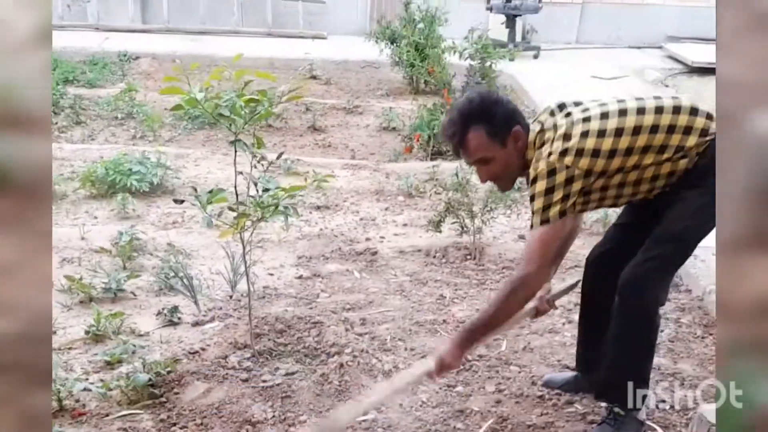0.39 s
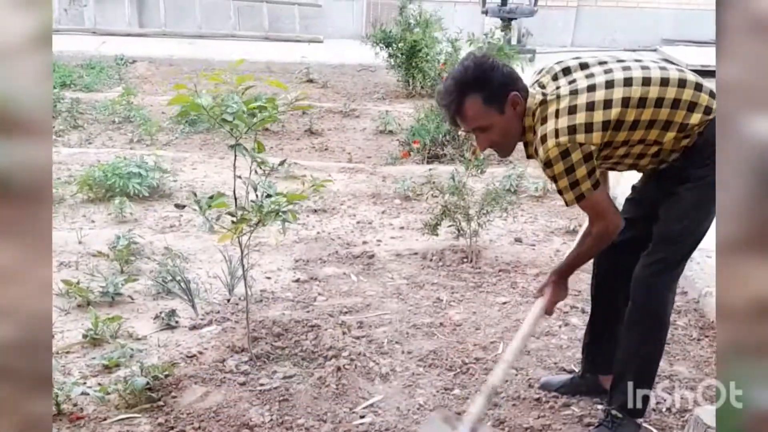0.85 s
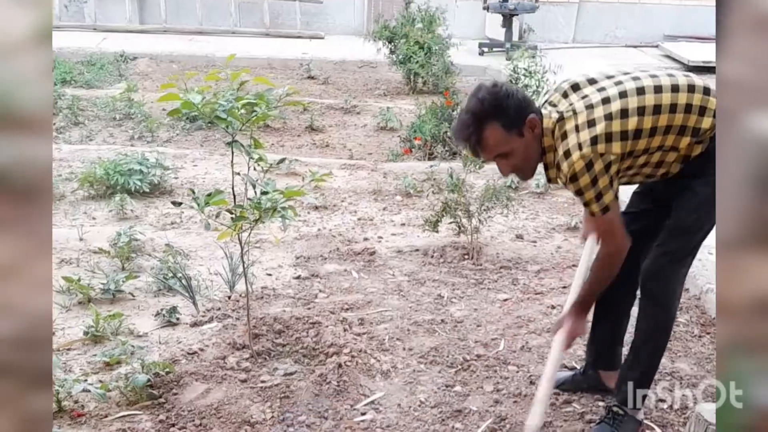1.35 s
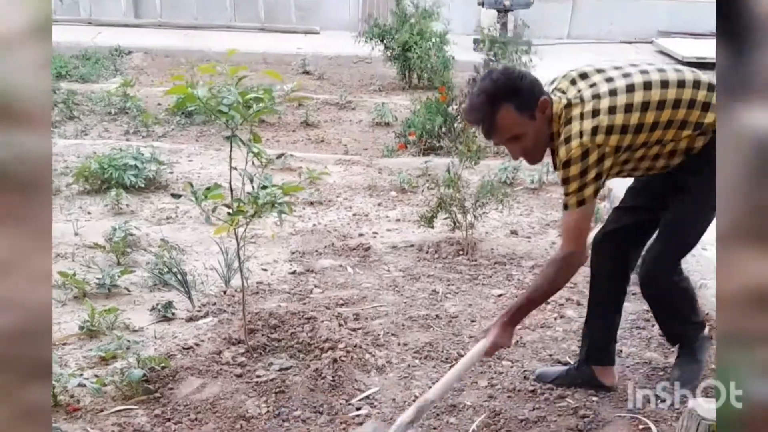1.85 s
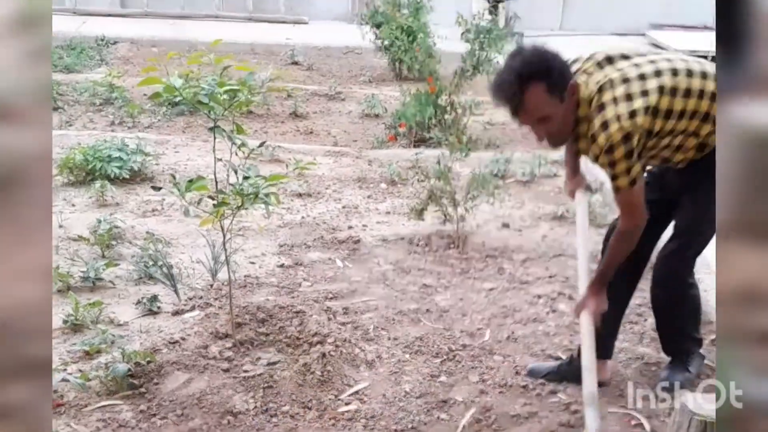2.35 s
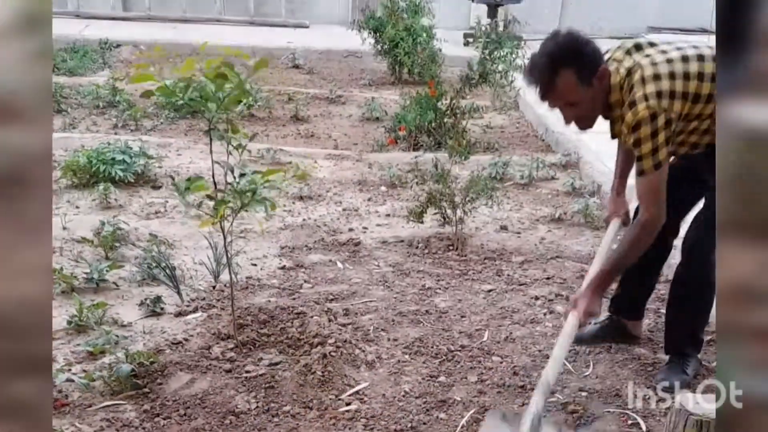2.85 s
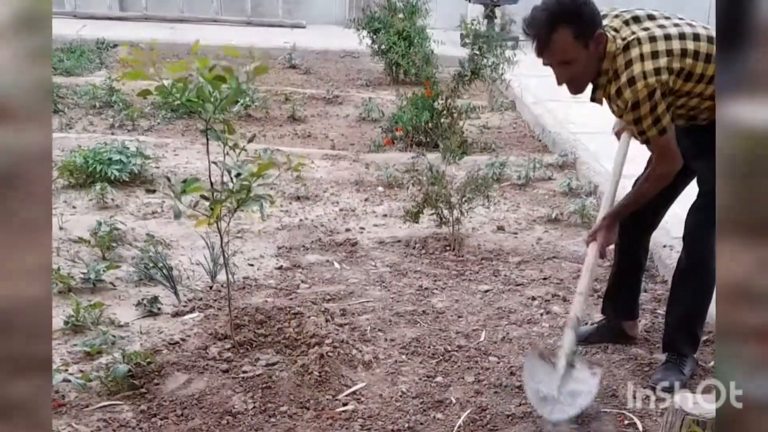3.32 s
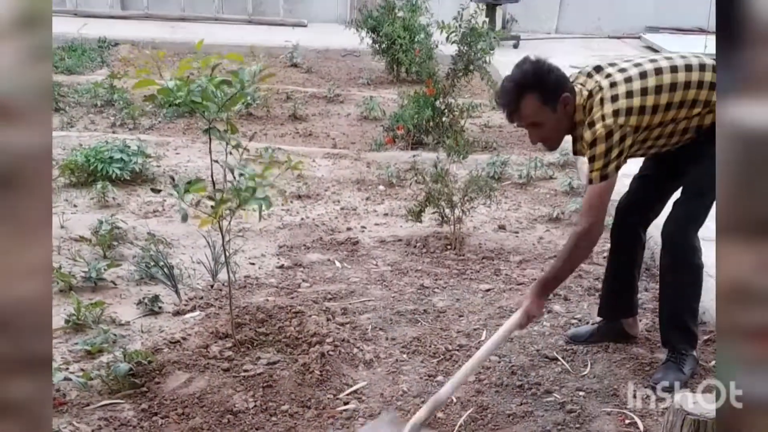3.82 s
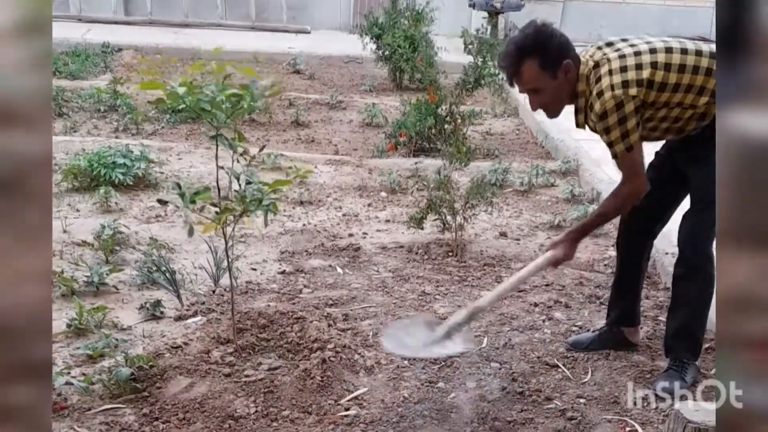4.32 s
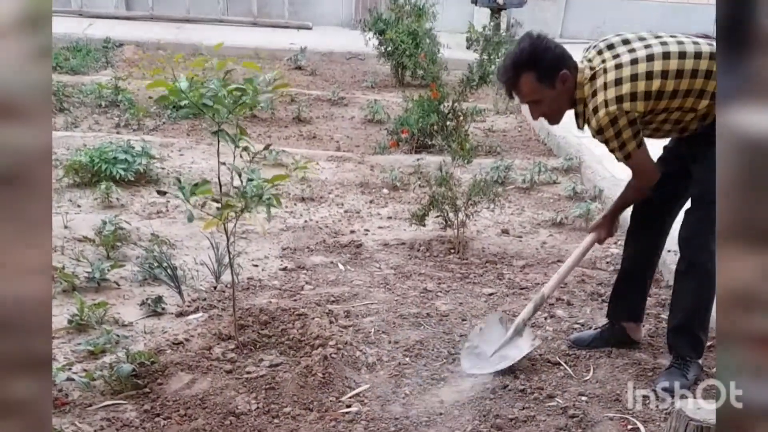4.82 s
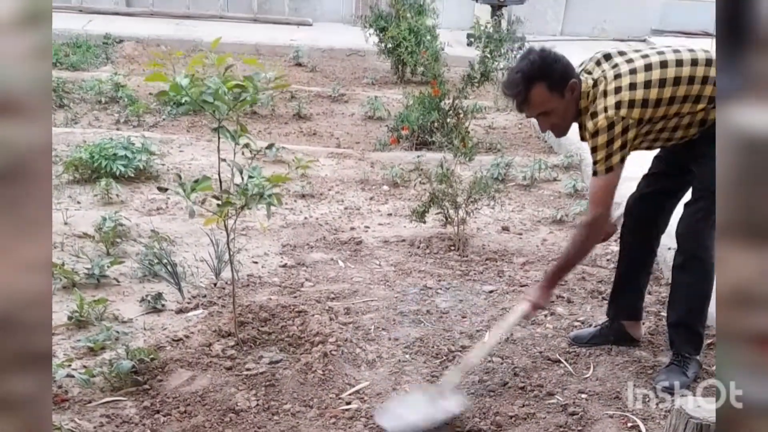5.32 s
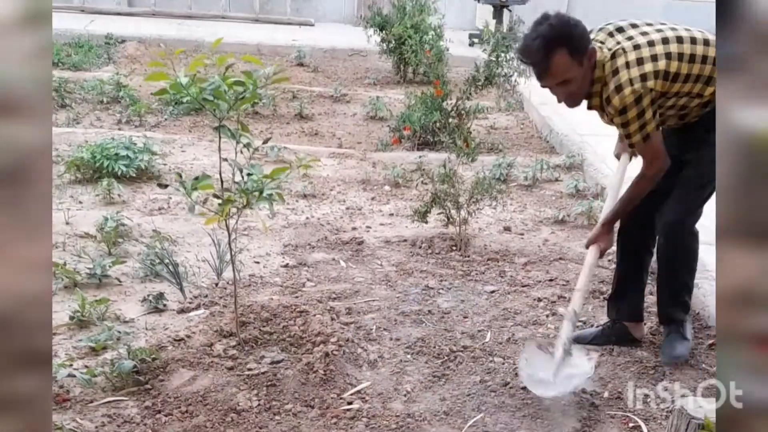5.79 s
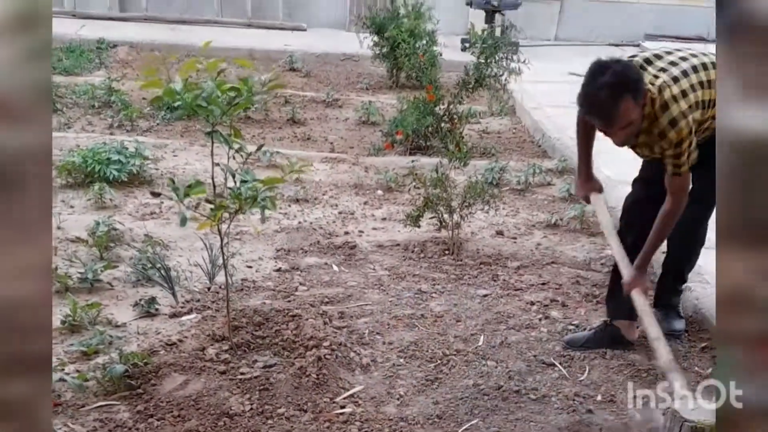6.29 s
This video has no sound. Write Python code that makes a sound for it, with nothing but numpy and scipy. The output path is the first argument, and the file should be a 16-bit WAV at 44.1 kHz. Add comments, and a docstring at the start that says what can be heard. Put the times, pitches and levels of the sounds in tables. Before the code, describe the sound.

A steel shovel chops into dry, stony soil eight times outdoors, each chop followed by a gritty drag, with low thumps and thin background hiss.

```python
"""A low drone, far traffic and thin outdoor hiss open the scene at a small two-port microphone.
The drone soon fades, and a few steps away a steel shovel chops into dry soil eight times and drags through it.
Filtered noise makes the background and the swells of deep rumble, most of them during the pulls.
Grains of noise force and short stone bursts rub and click on the blade, which rings briefly in damped modes.
Damped low swings thump the ground, some under a chop, others during or after a pull."""
import sys
import numpy as np
from scipy import signal
from scipy.fft import rfft, irfft
from scipy.io import wavfile
from scipy.ndimage import uniform_filter1d

SR = 44100
rng = np.random.default_rng(int(sys.argv[2]) if len(sys.argv) > 2 else 0)


def store_wav(level_fs):
    """Save 16-bit WAV to argv[1]."""
    pcm = np.round(np.clip(np.atleast_2d(level_fs), -1, 1) * 32767)
    wavfile.write(sys.argv[1], SR, pcm.T.astype(np.int16))


def magnitude_from_level(level_db):
    """Linear magnitude for a level in decibels (20 dB per decade)."""
    exponent = np.asarray(level_db, float) / 20
    return 10 ** exponent


N = 283122  # samples


def evened(x):
    """Scales to rms 1."""
    return x / np.sqrt(np.mean(x ** 2) + 1e-20)


def read(points, hz):
    """Reads a spectrum table on a log-frequency axis."""
    f, value = np.transpose(points)
    return np.interp(np.log(hz + 1), np.log(f + 1), value)


def wander(corner_hz, count):
    """Slow chance curves of rms about 1: low-passed noise drawn 60 times a second."""
    knots = rng.standard_normal((count, int(N / SR * 60) + 2))
    smooth = signal.lfilter([1], [1, -np.exp(-2 * np.pi * corner_hz / 60)], knots, axis=1)
    at = np.arange(N) * 60 / SR
    return np.array([np.interp(at, np.arange(len(k)), evened(k - k.mean())) for k in smooth])


def field(tone, likeness, patchy_db, lumpy_db):
    """Diffuse noise at two ports: random short-time spectra with drifting patches and lumps shared by all bins."""
    frames, hz = N // 256 + 5, np.fft.rfftfreq(1024, 1 / SR)
    a, b, c, d, patches = rng.standard_normal((frames, 513, 5)).T
    patches = evened(uniform_filter1d(uniform_filter1d(patches, 8, 0), 12, 1))
    lumps = evened(uniform_filter1d(rng.standard_normal(frames), 6))
    same = np.clip(read(likeness, hz), -1, 1)[:, None]
    left = a + 1j * b
    right = same * left + np.sqrt(1 - same ** 2) * (c + 1j * d)
    gain = magnitude_from_level(read(tone, hz)[:, None] + patchy_db * patches + lumpy_db * lumps)
    spectra = np.array([left, right]) * gain
    return evened(signal.istft(spectra, nperseg=1024, noverlap=768)[1][:, :N])


def rumble():
    """A distant low drone that dies away: noise in one narrow wavering band."""
    level_db, pitch_hz, width_hz = -51, 138.2, 30
    end_s, fade_db_per_s = 0.53, 120
    t = np.arange(N) / SR
    r = np.exp(-np.pi * width_hz / SR)
    slow = signal.lfilter([1], [1, -2 * r, r * r], rng.standard_normal((N, 2)) @ [1, 1j])
    drone = (slow * np.exp(2j * np.pi * pitch_hz * t)).real
    return magnitude_from_level(level_db - fade_db_per_s * np.maximum(t - end_s, 0)) * evened(drone)


# Colour of the distant wash and hiss: (frequency [Hz], relative density [dB])
YARD_TONE = [(88, -43), (150, 1.5), (240, -18.5), (276, -4.5), (371, -7), (409, -12), (508, -7), (594, -12),
             (2050, -23.5), (4080, -23), (6420, -26.5), (11100, -22.5), (14900, -27), (16500, -79)]
# How alike the wash is at the two ports: (frequency [Hz], likeness [0 to 1])
YARD_LIKENESS = [(150, 0.9), (300, 0.76), (600, 0.42), (1100, 0.012), (6500, 0.024), (8000, 0.69),
                 (10500, 1), (12500, 0.67), (15000, .8)]
# Background level, lower for a while after the loudest chop: (time [s], level [dB])
YARD_LEVEL = [(0.1, -52.5), (.9, -51), (1.75, -52), (2.3, -53), (3.35, -53), (4.25, -56.5), (5.35, -53),
              (6.15, -52)]


def yard():
    """Smooth distant wash of leaves and town, and thin hiss: a diffuse noise field that dips after the loudest chop."""
    s, db = np.transpose(YARD_LEVEL)
    level = magnitude_from_level(np.interp(np.arange(N) / SR, s, db))
    return level * field(YARD_TONE, YARD_LIKENESS, patchy_db=1.53, lumpy_db=0.5)


# Colour of both traffic and deep swells: (frequency [Hz], relative density [dB])
LOW_TONE = [(20, -35), (35, 3), (55, -3), (120, 3.5), (200, -6.5), (350, -13.5), (600, -50)]
# How alike far traffic is at the two ports: (frequency [Hz], likeness [0 to 1])
TRAFFIC_LIKENESS = [(30, 1), (120, 0.87), (400, 0.86)]


def traffic():
    """Far town traffic: a steady low noise field that reaches both ports nearly alike."""
    return magnitude_from_level(-52) * field(LOW_TONE, TRAFFIC_LIKENESS, patchy_db=1.6, lumpy_db=0.0)


# How alike the swells are at the two ports: (frequency [Hz], likeness [0 to 1])
SWELL_LIKENESS = [(30, 0.22), (70, 0.58), (150, 0.7), (400, 0.97)]
# Swells of deep rumble, most during the pulls: (time [s], peak level [dB], time from peak to 1/e [s])
DEEP_SWELLS = [(.58, -43, 0.24), (1.34, -52, 0.11), (1.64, -44.5, 0.18), (2.25, -51.5, 0.25),
               (2.75, -50, 0.076), (3.13, -46, 0.14), (3.9, -52, 0.2), (4.77, -46.5, 0.086),
               (5.65, -50.5, 0.35), (6.42, -40.5, 0.2)]


def deep_swells():
    """Swells of deep rumble, most during the pulls: low lumpy noise, least alike at the ports in the deep bass."""
    t = np.arange(N) / SR
    swells = sum(magnitude_from_level(db) * np.exp(-((t - s) / width) ** 2) for s, db, width in DEEP_SWELLS)
    return swells * field(LOW_TONE, SWELL_LIKENESS, patchy_db=-1.5, lumpy_db=0.5)


# Low thumps and knocks, some under a chop, others during or after a pull:
# (onset time [s], swing level [dB], settled pitch [Hz], puff above the swing [dB])
GROUND_THUMPS = [(0.486, -32, 187, -10), (0.719, -42, 170, 2.5), (0.769, -42, 145, -4),
                 (1.038, -46, 380, 1), (1.272, -32.5, 115, -2), (1.558, -31.5, 111, -3),
                 (1.599, -44.5, 110, 0), (1.628, -45.5, 504, 1), (1.672, -39, 57.6, -5),
                 (1.675, -29.5, 97, -5), (2.272, -40, 109, 3.5), (2.963, -31.5, 111, 1.5),
                 (2.966, -37.5, 363, -13), (3.852, -21.5, 118.6, -6.5), (4.592, -26, 122.7, 0),
                 (4.594, -30, 274.4, -4.5), (4.639, -36, 137, -1), (5.384, -37, 124, -4.5),
                 (5.559, -37.5, 140, -5.5), (6.194, -35, 99, -12), (6.218, -37, 129, -16)]


def thumps():
    """A low damped swing whose pitch sags, plus a dull puff around it that differs at the two ports."""
    t, out = np.arange(6000) / SR, np.zeros((2, N + 6000))
    noise = rng.standard_normal((len(GROUND_THUMPS), 3, 8000))
    for (s, db, hz, puff_db), puff in zip(GROUND_THUMPS, noise):
        around = signal.butter(2, [0.26 * hz, 1.55 * hz], "band", fs=SR, output="sos")
        puff = evened(signal.sosfilt(around, puff)[:, 2000:])
        decay_s = .005 + .7 / hz  # a fixed part plus some cycles
        shape = (1 - np.exp(-t / 0.0055)) ** 3 * np.exp(-t / decay_s)  # the ground gives way slowly
        swing = np.sin(2 * np.pi * hz * (t + 0.22 * 0.009 * (1 - np.exp(-t / 0.0033))))
        air = magnitude_from_level(puff_db) * (0.67 * puff[0] + 0.84 * puff[1:])  # shared and separate parts
        out[:, round(s * SR):][:, :6000] += magnitude_from_level(db) * (swing + air) * shape / shape.max()
    return out[:, :N]


def colour(points):
    """Causal minimum-phase filter taps for a spectrum table."""
    hz = abs(np.fft.fftfreq(4096, 1 / SR))
    log_gain = np.log(magnitude_from_level(np.maximum(read(points, hz), -80)))
    return np.fft.ifft(np.exp(np.conj(signal.hilbert(log_gain)))).real[:2048]


def bands(x):
    """Splits into crumble, blade, rasp and sand ranges."""
    crumble_hz, rasp_hz, sand_hz = 1400, 4200, 7200
    edges = [(crumble_hz, "low"), ([crumble_hz, rasp_hz], "band"), ([rasp_hz, sand_hz], "band"), (sand_hz, "high")]
    return [signal.sosfilt(signal.butter(4, hz, kind, fs=SR, output="sos"), x) for hz, kind in edges]


# Ringing modes of the steel blade: (pitch [Hz], width before limiting [Hz], relative level [dB])
BLADE_MODES = [(906, 18.4, -0.5), (1063, 173, -11.5), (1708, 38, -8), (2087, 42, -6.5), (2410, 31.6, -20),
               (2616, 35, -0.5), (2796, 22, -4), (2945, 66, -3.5), (3328, 37, 0), (3633, 130, -5.5),
               (3880, 42, -7.5), (4440, 23, -17), (5030, 36, -10.5), (5312, 88, -3.5), (5720, 115, -5.5),
               (6150, 20, -3.5), (8056, 250, -9.5), (8730, 67, -2), (9380, 42, 0.5), (9830, 26, -2),
               (10900, 57, -12), (11060, 120, -15), (11800, 64, -13), (12570, 36, 0)]
# Colour of the bare contact of grit on steel: (frequency [Hz], relative density [dB])
GRIT_TONE = [(88, -35), (150, -1.5), (255, -10.5), (528, 1), (695, -22), (934, -2.5), (1250, -26),
             (1650, -18.5), (2300, -12.5), (2900, -3.5), (5070, -4.5), (6670, -13), (10300, 0),
             (14700, -3.5), (15500, -36), (16500, -67)]


def blade(force, grip_db, ring_db):
    """The force rings the blade's modes, each held more or less by the soil, over the bare click of contact."""
    out = signal.oaconvolve(force, colour(GRIT_TONE)[None], axes=1)[:, :N]
    for (hz, width, db), held_db in zip(BLADE_MODES, grip_db):
        r = np.exp(-np.pi * np.clip(width, 28, 400) / SR)
        poles = [1, -2 * r * np.cos(2 * np.pi * hz / SR), r * r]
        mode = signal.lfilter([1 - r * r], poles, force * magnitude_from_level(held_db), axis=1)
        out += magnitude_from_level(ring_db + db) * mode * np.sin(2 * np.pi * hz / SR)
    return out


def grip():
    """Soil damps each blade mode more or less by chance as time goes on, in dB."""
    return 5.5 * np.clip(wander(8.5, count=len(BLADE_MODES)), -2, 1.1)


# Stones struck by the blade:
# (time [s], relative force level [dB], treble tilt [dB], low knock [dB])
STRUCK_STONES = [(0.4918, -19, -4, 19), (0.507, -22, -3, 18), (0.546, -12, -4, 1),
                 (0.5811, -20.5, -10, -17), (0.6652, -18.5, 2, -2), (1.2747, -3, -1, 4.5),
                 (1.3493, -16, -3, 11), (1.3717, -22, -2, 8.5), (1.439, -12.5, 4, 0), (1.4842, -17, -13, 0),
                 (1.515, -20.5, 8, -8), (1.636, -43, 6, 19), (2.0702, -12, -1, -4), (2.0853, -14, 0, 2),
                 (2.1295, -14, 5, -7), (2.14, -9.5, -0.5, -20), (2.1922, -12.5, -8.5, 7),
                 (2.2013, -35, -8, -13), (2.2347, -18.5, -6, -13), (2.97, -5, 2.5, 2),
                 (3.0898, -17.5, 9, -25), (3.2088, -23, 4, -8), (3.8545, 2.5, -1.5, -6),
                 (3.865, -11, -15, -9), (3.91, -18, -1, 2), (4.596, -6.5, -4.5, -6), (4.6324, -20, 2, -9),
                 (5.3818, -11.5, -5, 6), (5.3992, -1, 2, -19), (5.441, -12, 0, -16), (5.5204, -15, -4, -5),
                 (6.1979, -9.5, -1.5, -1), (6.2232, -5, 4.5, -2)]


def stones(grip_db):
    """Each stone is a short crunch of force with a crack, stronger in loud ones; some brighter, some knock lower."""
    decay_s, rise_s, crack_s, crack_width_s = .0025, 0.0005, .0008, 0.00049
    t, out = np.arange(2000) / SR, np.zeros((4, 2, N + 2000))  # range, shared or scattered part, time
    bursts = rng.standard_normal((len(STRUCK_STONES), 2, 2000))
    for (s, peak_db, tilt_db, knock_db), burst in zip(STRUCK_STONES, bursts):
        crack = 0.24 * min(magnitude_from_level(peak_db - 15.5), 1) * np.exp(-((t - crack_s) / crack_width_s) ** 2)
        fade = np.exp(-t / decay_s) + crack
        for k, db in enumerate([knock_db, -tilt_db, -.3 * tilt_db, tilt_db]):
            out[k, :, round(s * SR):][:, :2000] += magnitude_from_level(peak_db + db) * burst * fade * np.minimum(t / rise_s, 1)
    parts = [bands(blade(force[:, :N], grip_db, ring_db=-0.5))[k] for k, force in enumerate(out)]
    # a small stone moves little bass, and is duller at the top than sand
    parts[0] = signal.sosfilt(signal.butter(2, 650, "high", fs=SR, output="sos"), parts[0])
    parts[3] = signal.sosfilt(signal.butter(2, 12500, "low", fs=SR, output="sos"), parts[3])
    parts[3] *= magnitude_from_level([[0], [12.0]])  # the scattered part of the treble is raised: the clicks sound wider
    return magnitude_from_level([[-1.5], [-5.5]]) * sum(parts)  # below the treble, the shared part outweighs the scattered one


def patchy(x, patchy_db):
    """Clods of different sizes: the colour flickers in short patches of pitch and time."""
    hz, t, z = signal.stft(x, SR, nperseg=256, noverlap=192)
    patches = rng.standard_normal((len(t), len(hz))).T
    patches = evened(uniform_filter1d(uniform_filter1d(patches, size=7, axis=0), size=10, axis=1))
    return signal.istft(z * magnitude_from_level(patchy_db * patches), SR, nperseg=256, noverlap=192)[1][:, :N]


# The blade enters the soil: (time [s], chop level [dB], sand hiss above it [dB],
# coarseness of this soil [dB], rasp of this blade angle [dB])
SOIL_CHOPS = [(0.487, -24, -3.5, 0, -1.5), (1.27, -28.5, 3, 0.5, 1), (2.059, -36, -5, 2.5, 1.5),
              (2.965, -27.5, 0, 1, 0), (3.850, -19, -6, 1.5, 1), (4.594, -32.5, 3.5, 2, 0),
              (5.38, -38, 3, 2, 0), (6.193, -29, -0.5, 5, 1)]
# Each pull through the soil, one list a chop, until the blade lifts:
# (time [s], drag level [dB], fineness = sand hiss above the drag [dB])
SOIL_PULLS = [
    [(0.52, -39.5, -4), (0.578, -31, 0), (0.654, -36.5, 1), (0.668, -31.5, -1.5), (0.692, -40.5, 5),
     (0.744, -36.5, -2.5), (0.79, -47.5, 2)],
    [(1.3, -37.5, 6.5), (1.336, -33.5, 3), (1.44, -30.5, 5), (1.468, -39, 9), (1.486, -31, -4),
     (1.512, -38, 2), (1.57, -41, 1)],
    [(2.08, -33.5, 4), (2.104, -36.5, 0), (2.2, -32, 5), (2.26, -36.5, 6), (2.446, -40, 6.5),
     (2.476, -42, 7), (2.5, -51.5, 6.5)],
    [(2.995, -38, 6), (3.097, -39, 13.5), (3.111, -36, 7), (3.135, -43, 10), (3.221, -45.5, 2),
     (3.235, -52.5, 7), (3.26, -50.5, 0.5)],
    [(3.885, -32.5, -0.5), (3.983, -41.5, 3.5), (3.993, -43.5, 7), (4.025, -36.5, 3), (4.139, -44.5, 3.5),
     (4.155, -48.5, 0)],
    [(4.62, -43.5, 6), (4.648, -42, 10), (4.768, -42, 6.5), (4.786, -39, 2.5), (4.832, -45.5, 5.5),
     (4.858, -54, 7.5), (4.865, -49, 3)],
    [(5.39, -34, 8), (5.4, -33, 9), (5.416, -36, 7.5), (5.508, -30.5, -1), (5.526, -36, 10),
     (5.646, -42.5, 2.5), (5.65, -43, 6)],
    [(6.21, -37, 2.5), (6.226, -27.5, 4), (6.286, -46, 5.5), (6.31, -39, 6), (6.404, -44.5, 7.5),
     (6.42, -41, 3)],
]


def effort():
    """Push as a factor and fineness in dB over time: a sharp chop, then the pull, then the lift."""
    rise_s, start_db, fall_db_per_s = 0.002, -24, 501  # of the chop
    lift_db_per_s, sand_lift_db_per_s = 483, 150  # the drag dies as the blade lifts, the sand faster still
    t, push, fine_db = np.arange(N) / SR, np.zeros(N), np.zeros(N)
    for (start, chop_db, chop_fine_db, *_), rows in zip(SOIL_CHOPS, SOIL_PULLS):
        s, drag_db, sand_db = np.transpose(rows)
        on = (t >= start) & (t < s[-1] + .15)
        age, late = t[on] - start, np.maximum(t[on] - s[-1], 0)
        rise = start_db * np.maximum(1 - age / rise_s, 0)
        chop = chop_db + rise - fall_db_per_s * np.maximum(age - rise_s, 0)
        pull = np.interp(t[on], s, drag_db) - lift_db_per_s * late
        push[on] = np.hypot(magnitude_from_level(chop), magnitude_from_level(pull) * np.clip(age / (s[0] - start), 0, 1))
        fineness = np.interp(t[on], np.r_[start + rise_s, s], np.r_[chop_fine_db, sand_db])
        fine_db[on] = fineness - sand_lift_db_per_s * late
    return push, fine_db


def drag(grip_db):
    """Grains of grit, in clumps, and chance pebbles rub along the blade while it moves through the soil."""
    grains_per_s, pebbles_per_s, pebble_decay_s = 6000, 90, .0025
    ring_db = 3
    grains = magnitude_from_level(4.9 * np.minimum(rng.exponential(1, N), 6)) * (rng.random(N) < grains_per_s / SR)
    clumps = magnitude_from_level(0.46 * uniform_filter1d(evened(uniform_filter1d(rng.standard_normal(N), 260)), 90))
    met = magnitude_from_level(4 - 1.33 * rng.exponential(1, N)) * (rng.random(N) < pebbles_per_s / SR)
    pebbles = signal.lfilter([1], [1, -np.exp(-1 / (pebble_decay_s * SR))], met)
    rub = clumps * (grains + 1.81 + pebbles)  # the constant is steady friction
    force = patchy(rub * rng.standard_normal((2, N)), patchy_db=1.96)  # shared and scattered parts
    push, fine_db = effort()
    push_db = 20 * np.log10(np.maximum(push, magnitude_from_level(-46.5)))
    stroke = np.maximum(np.searchsorted(np.transpose(SOIL_CHOPS)[0], np.arange(N) / SR) - 1, 0)
    coarse_db, angle_db = np.array(SOIL_CHOPS)[stroke, 3:].T
    lumps_db = 2.5 * wander(25, count=1)[0]  # the crumble comes in lumps
    # crumble follows the push only in part, rasp follows the fineness in part
    crumble_db = -49 + coarse_db + lumps_db + 0.43 * (push_db + 35.5) - push_db
    rasp_db = -2.5 + angle_db + 0.36 * fine_db
    shares = [magnitude_from_level(db) for db in (crumble_db, 0, rasp_db, fine_db)]
    steady = [part.std() for part in bands(blade(force, grip_db, ring_db))]
    parts = bands(blade(push * force, grip_db, ring_db))  # the blade rings on after the push ends
    return sum(share * part / rms for share, part, rms in zip(shares, parts, steady))


def ports(near, scattered, same, lead):
    """Two microphone ports: a shared part, shifted in phase between them, and an unrelated scattered part."""
    hz = np.fft.rfftfreq(N, 1 / SR)
    c, turn = np.clip(read(same, hz), 0, 1), np.exp(.5j * read(lead, hz))
    a, b = np.sqrt((1 + c) / 2) * rfft(near), np.sqrt((1 - c) / 2) * rfft(scattered)
    return irfft(np.array([(a + b) * turn, (a - b) / turn]), N)


# How alike the shovel is at the two ports: (frequency [Hz], likeness [0 to 1])
SHOVEL_LIKENESS = [(60, 0.32), (130, 0.3), (290, 1), (640, 0.63), (1410, 0.58), (3100, 0.81), (6820, 0.5),
                   (7600, 0.77), (8000, 1), (15000, 0.93)]
# Phase by which the left port leads at first: (frequency [Hz], lead [rad])
EARLY_LEFT_LEAD = [(200, 0), (600, -.1), (1000, .8), (1400, 1.8), (1900, .3), (2400, -.3), (3300, .4),
                   (4100, .9), (5000, .5), (6300, 1.1), (7400, 0), (15000, .05)]
# The same once the digging has moved further to one side: (frequency [Hz], lead [rad])
LATE_LEFT_LEAD = [(200, 0), (600, -.2), (1200, 2.1), (1600, .2), (2150, 0), (2600, 1.3), (4200, 2.2),
                  (6000, 3.2), (7200, 2.8), (7750, 0), (15000, 0)]


def at_microphone(digging):
    """The shovel reaches the ports with unequal phase, which changes once the digging has moved to one side."""
    moved = np.arange(N) / SR > 3.6  # s
    early = ports(*(digging * ~moved), SHOVEL_LIKENESS, EARLY_LEFT_LEAD)
    return early + ports(*(digging * moved), SHOVEL_LIKENESS, LATE_LEFT_LEAD)


def walls(x):
    """Sparse echoes from the ground and garden walls: random taps from 4 ms on, falling 60 dB in 30 ms."""
    t = np.arange(6000) / SR
    chosen = rng.choice([-1., 1.], (2, 6000)) * (rng.random((2, 6000)) < .05)
    taps = chosen * magnitude_from_level(-60 * t / 0.03) * (t > .004)
    return signal.oaconvolve(x, taps / np.linalg.norm(taps[0]), axes=1)[:, :N]


def scene():
    """Shovel through the two ports, with echoes, ground thumps, deep swells and background."""
    grip_db = grip()
    shovel = at_microphone(drag(grip_db) + stones(grip_db))
    background = rumble() + yard() + traffic() + deep_swells()
    return shovel + magnitude_from_level(-11) * walls(shovel) + thumps() + background


def roll_off(x):
    """The treble ends steeply here."""
    return signal.sosfilt(signal.butter(12, 16640, fs=SR, output="sos"), x)


def record(dry):
    """The microphone drops the deepest bass, rounds off near full scale and is limited at the top of the treble."""
    dry = signal.sosfilt(signal.butter(4, 39.7, "high", fs=SR, output="sos"), dry)
    dry = dry / (1 + (dry / .9) ** 4) ** .25
    edge = signal.firwin(255, 16300, window=("kaiser", 9), fs=SR)
    mix = signal.oaconvolve(dry, edge[None], "same")
    return roll_off(mix)


dry = scene()
out = record(dry)
store_wav(out)
```